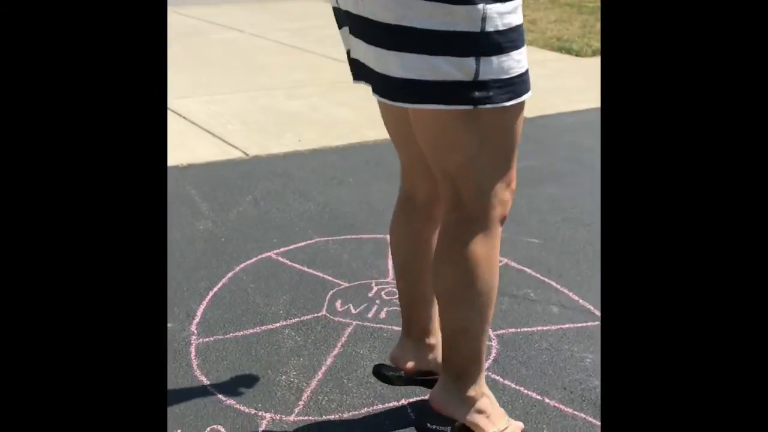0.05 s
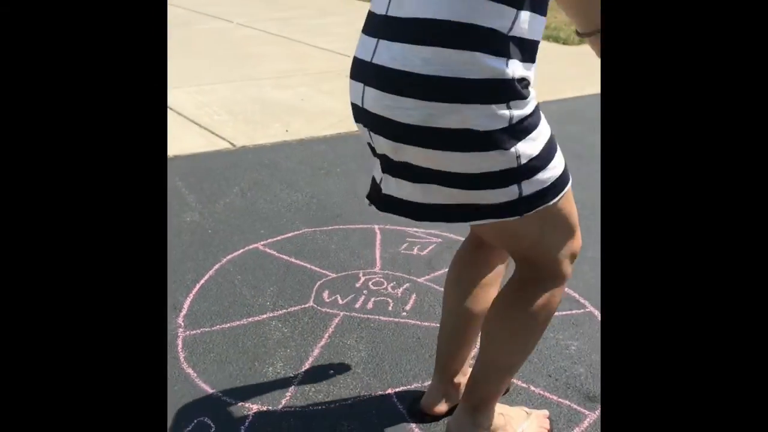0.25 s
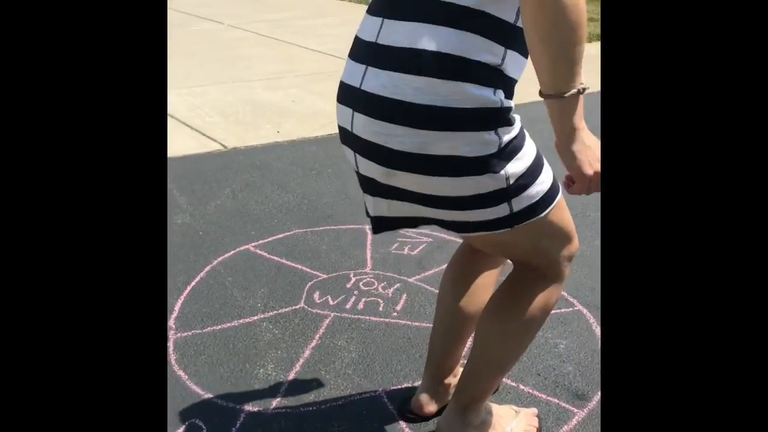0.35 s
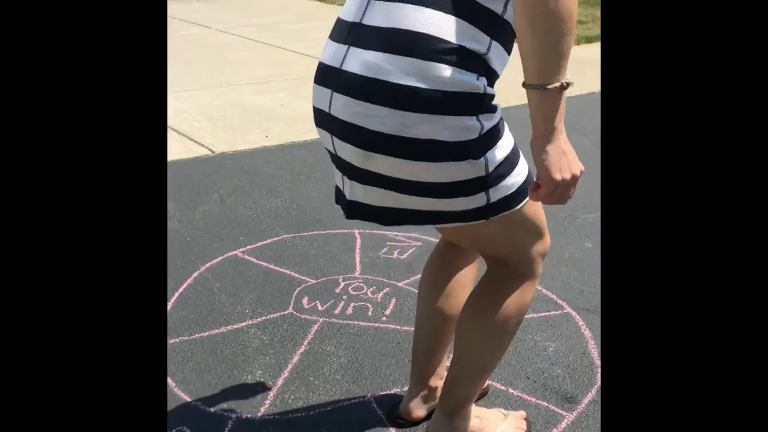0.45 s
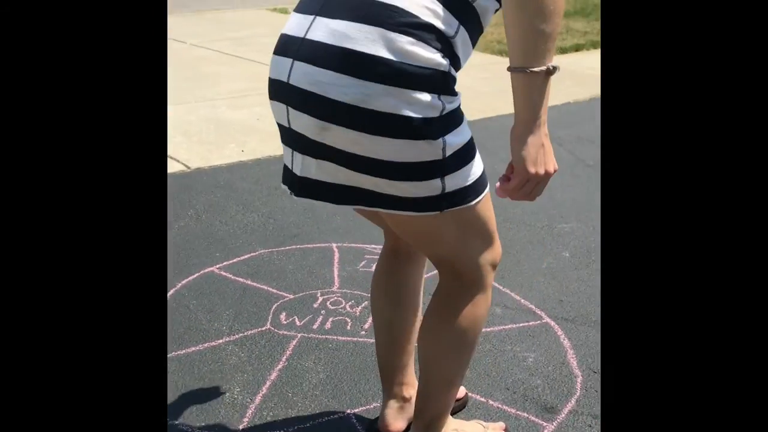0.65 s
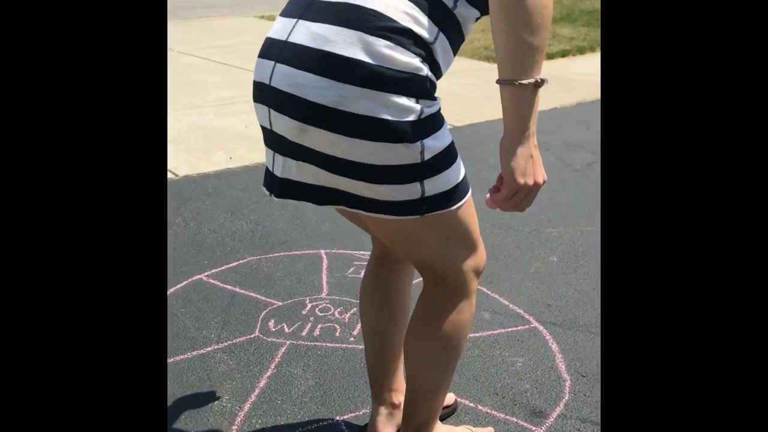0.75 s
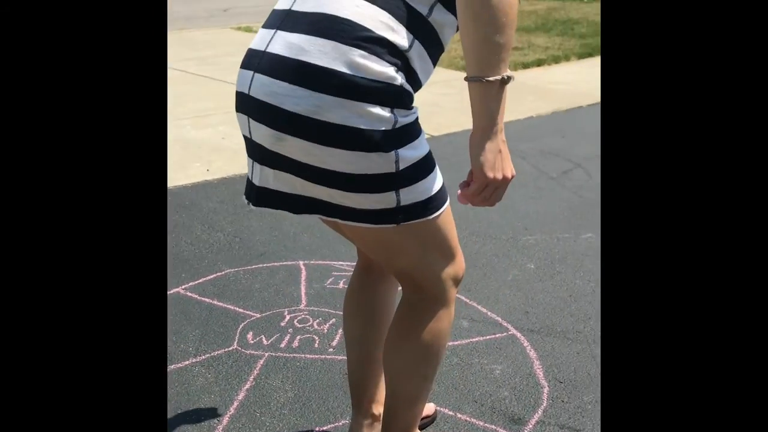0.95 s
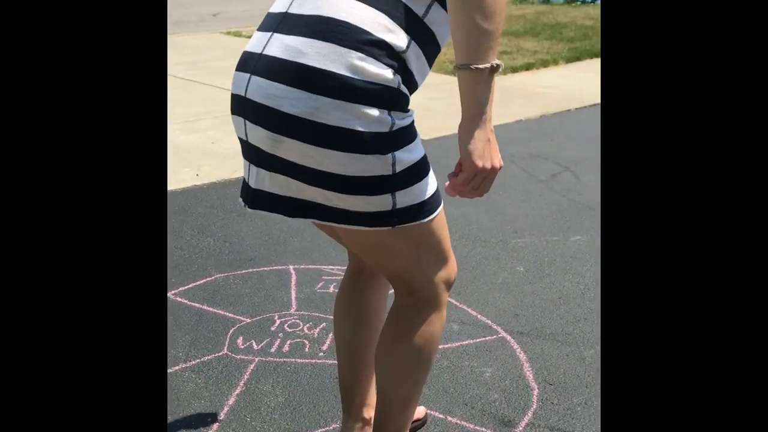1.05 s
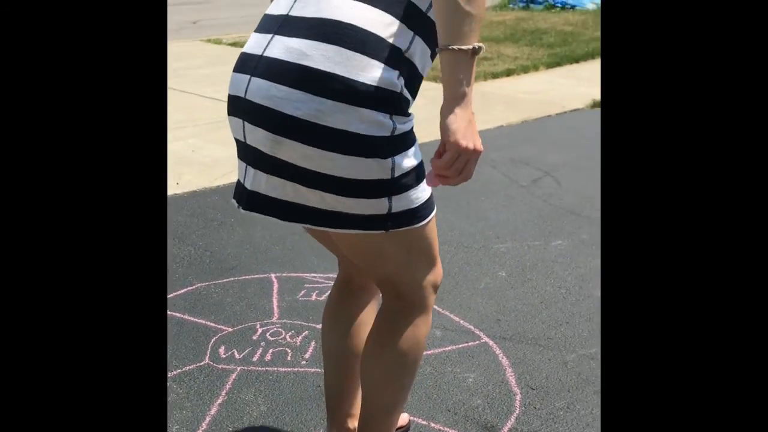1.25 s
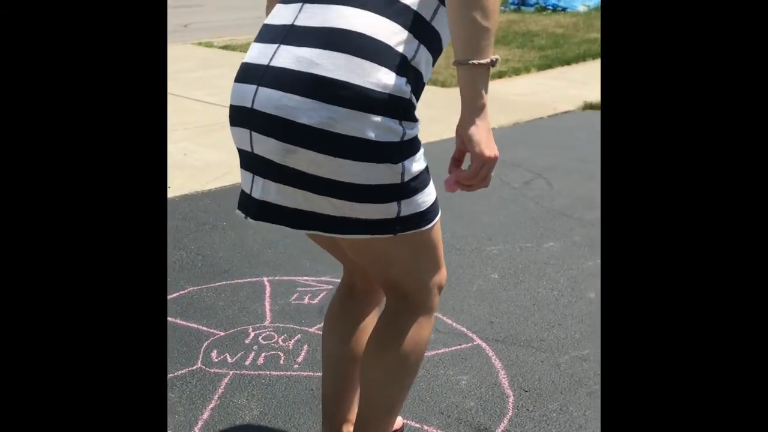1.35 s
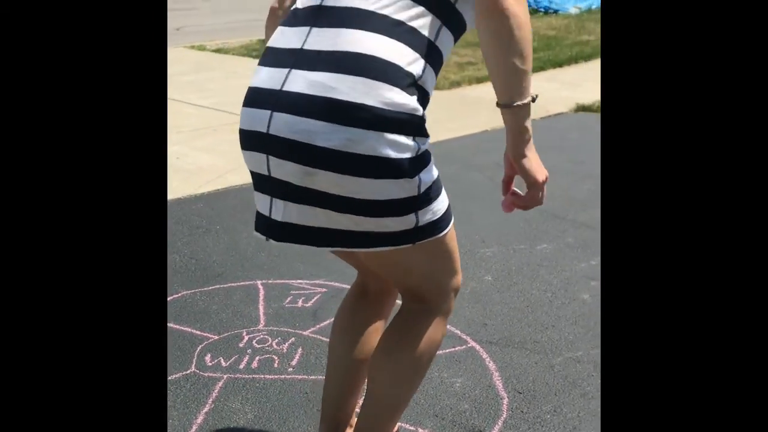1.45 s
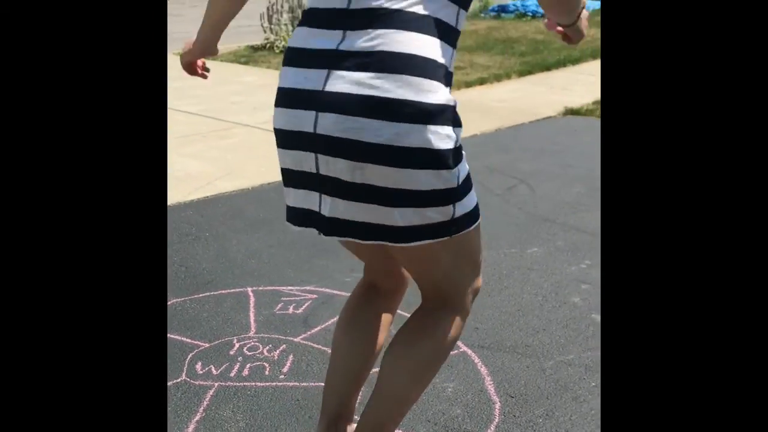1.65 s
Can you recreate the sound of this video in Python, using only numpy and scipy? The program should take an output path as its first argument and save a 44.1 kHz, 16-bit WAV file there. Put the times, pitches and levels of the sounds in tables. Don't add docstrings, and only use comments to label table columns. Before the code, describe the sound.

A single hop landing in slide sandals: a tiny tick, then a bright, dry double smack with grit on the driveway. A bird whistles before it, quiet open air follows, and a distant bird chirps at the end.

```python
import sys
import numpy as np
from scipy import signal
from scipy.io import wavfile
from scipy.ndimage import uniform_filter1d

SR = 44100
rng = np.random.default_rng(int(sys.argv[2]) if len(sys.argv) > 2 else 0)


def voltage_ratio(level):
    return 10 ** (np.asarray(level, float) / 20)


def store_pcm(level_fs):
    pcm = np.round(np.clip(level_fs, -1, 1) * 32767).astype(np.int16)
    wavfile.write(sys.argv[1], SR, np.atleast_2d(pcm).T)


N = 74970
T = np.arange(N) / SR
SLAP_LOW_HZ = 1000

# start [s], air-pocket peak [dB], pocket pitch [Hz], pocket swell [s], crack peak [dB].
SOLE_CONTACTS = [(.0002, -60, 3000, 0.00014, -56.5), (0.1639, -31, 3000, 0.0002, -39),
                 (.1639, -43, 5000, .0003, -60), (0.1644, -34, 2100, 0.00073, -60.5),
                 (.1675, -46, 3600, .0008, -55), (0.1685, -37, 1450, .0008, -53),
                 (.1713, -34, 1000, 0.0008, -56.5), (.1738, -39, 1300, .0006, -56),
                 (.1838, -48, 3000, 0.0002, -44), (.192, -50, 2300, .001, -62),
                 (.2034, -38, 2800, 0.0011, -36), (0.2068, -26.5, 2040, 0.00024, -36.5),
                 (0.2070, 2, 2100, 0.00026, -3), (.20716, -11, 3200, .00028, -60),
                 (.2070, -24, 15300, .0003, -60), (.2071, -20, 8350, .00025, -60),
                 (.2071, -15, 5200, .0003, -60), (.2071, -21, 6600, .00025, -60),
                 (.2083, -22.5, 2300, .0012, -39.5), (.2115, -21, 3300, .0006, -45),
                 (.2117, -29, 8300, .0004, -60), (.2117, -27, 5300, .0004, -60),
                 (.2116, -12, 1750, .0011, -11), (.2120, -26, 1030, 0.0016, -40.5),
                 (0.2139, -24, 1750, 0.001, -28), (0.2204, -30, 1250, .0006, -31),
                 (.2214, -45, 3000, .0004, -36), (0.2346, -17, 1900, 0.0003, -19),
                 (.2346, -27, 3400, .0005, -50), (.2346, -34, 7250, .0006, -50),
                 (.2346, -33, 5200, .0005, -50), (0.2357, -15, 1890, 0.001, -25),
                 (0.2346, -28, 1170, 0.001, -50.5), (.2368, -33, 2900, .0006, -31),
                 (.2405, -41, 2100, .001, -50), (1.5802, -62, 2900, 0.0006, -62)]


def rms_one(x):
    return x / np.sqrt(np.mean(x ** 2) + 1e-20)


def band(x, hz, order=2):
    return signal.sosfilt(signal.butter(order, hz, "band", fs=SR, output="sos"), x + 1e-18)


def high(x, hz):
    return signal.sosfilt(signal.butter(4, hz, "high", fs=SR, output="sos"), x + 1e-18)


def drift(rate_hz):
    r = np.exp(-80 * np.pi * rate_hz / SR)
    slow = signal.lfilter([1], [1, -2 * r, r * r], rng.standard_normal(N // 40 + 2002))[2000:]
    return np.interp(np.arange(N) / 40, np.arange(len(slow)), rms_one(slow))


def bell(centre_s, width_s):
    return np.exp(-.5 * ((T - centre_s) / width_s) ** 2)


def ring(x, hz, t60_s):
    r = voltage_ratio(-60 / (t60_s * SR))
    w = 2 * np.pi * hz / SR
    return signal.lfilter([0, np.sin(w)], [1, -2 * r * np.cos(w), r * r], x + 1e-18)


def coloured(source, spectrum, patchy_db):
    hz, db = np.transpose(spectrum)
    edges_hz = 130 * 2 ** np.arange(0, 7.3, .5)
    out = 0
    for k, pair in enumerate(zip(edges_hz, edges_hz[1:])):
        level_db = np.interp(np.log(pair).mean(), np.log(hz), db) + patchy_db * drift(30)
        out = out + voltage_ratio(level_db) * band(source[k % 2], pair)
    return rms_one(out)


def air():
    # frequency [Hz], density [dB per Hz].
    hiss_spectrum = [(140, 0), (260, -4.5), (450, -9.5), (1250, -14), (2500, -22.5), (6000, -27.5),
                     (10500, -37.5), (15000, -35.5)]
    # centre [s], level [dB], width [s].
    rustles = [
        (0.526, -82, 0.0099),
        (1.129, -83, 0.0044),
        (1.697, -73, 0.013),
    ]
    hiss = voltage_ratio(-59.5) * coloured(rng.standard_normal((2, N)), hiss_spectrum, patchy_db=1.0)
    puffs = sum(voltage_ratio(db) * bell(s, width_s) for s, db, width_s in rustles)
    return hiss + puffs * rms_one(band(rng.standard_normal(N), (10000, 16000)))


def breeze():
    # centre [s], peak [dB], pitch [Hz], width [s].
    bumps = [
        (0.098, -47, 58.6, 0.025),
        (0.195, -42.5, 61.7, 0.0098),
        (0.585, -42, 60.7, 0.0056),
        (.637, -36, 61.17, 0.016),
        (1.558, -76, 58, 0.012),
        (1.654, -57, 55.1, 0.025),
    ]
    rumble_db, rumble_hz = -57.5, (36.47, 123)
    noise = band(rng.standard_normal(N + SR), rumble_hz, order=3)[SR:]
    out = voltage_ratio(rumble_db + 2.32 * drift(6.2)) * rms_one(noise)
    for s, db, hz, width_s in bumps:
        out = out + voltage_ratio(db) * bell(s, width_s) * np.sin(2 * np.pi * hz * (s - T))
    return out


def drone():
    # time [s], level [dB].
    loudness = [(0, -49), (.2, -61), (.45, -53), (.75, -51), (.95, -52.5), (1.15, -59.5), (1.4, -56.5),
                (1.7, -74)]
    # multiple of the base pitch, level [dB].
    orders = [(1, -2.5), (2, -15), (3, -22)]
    base_hz, wander, flutter_db = 84.2, .008, 4
    phase = 2 * np.pi * np.cumsum(base_hz * (1 + wander * drift(3.4))) / SR
    tone = sum(voltage_ratio(db + flutter_db * drift(15)) * np.sin(round(k) * phase) for k, db in orders)
    return np.sqrt(2) * voltage_ratio(np.interp(T, *np.transpose(loudness))) * tone


def whistle(notes, overtones):
    trill_db = 1.8
    out = np.zeros(N)
    for note in notes:
        s, hz, db = np.transpose(note)
        phase = 2 * np.pi * np.cumsum(np.interp(T, s, hz)) / SR
        tone = np.sin(phase)
        for k, over_db in overtones:
            unsteady = voltage_ratio(over_db + 10.0 * drift(14))
            tone = tone + unsteady * np.sin(round(k) * phase + 1.6 * drift(60))
        before_db = -150 if s[0] > .001 else None
        level = voltage_ratio(np.interp(T, s, db, right=-150, left=before_db))
        out += np.sqrt(2) * uniform_filter1d(level, size=60) * tone * voltage_ratio(trill_db * drift(70))
    return out


def near_bird():
    # time [s], pitch [Hz], level [dB].
    notes = [
        [(0.0, 2256, -55), (0.016, 2234, -44.5), (0.022, 2285, -51), (.045, 2325, -50), (0.058, 2357, -44),
         (0.07, 2400, -50.5), (0.08, 2450, -48.5), (0.086, 2370, -54.5)],
        [(.082, 2300, -62.5), (.092, 2350, -53), (.1, 2440, -64), (.115, 2360, -61), (.135, 2430, -62.5),
         (.148, 2380, -63), (.155, 2360, -78)],
        [(.078, 2670, -82.5), (.085, 2780, -64.5), (.092, 2967, -60.5), (.097, 2950, -83)],
        [(.116, 2000, -75), (.127, 2135, -52), (.155, 2135, -49.5), (.165, 2125, -50), (.172, 2110, -75)],
        [(.105, 1780, -75.5), (.114, 1850, -65.5), (.12, 1890, -84)],
        [(.005, 2840, -82), (.018, 2820, -75.5), (.045, 2820, -75.5), (.06, 2950, -87)],
    ]
    # multiple of the pitch, level [dB].
    overtones = [(2, -36), (6, -36)]
    # time [s], pitch [Hz], level [dB].
    thin_note = [(.072, 4950, -90), (.085, 5200, -77), (.098, 5300, -73), (.11, 5200, -76),
                 (.13, 5300, -86)]
    # multiple of the pitch, level [dB].
    thin_overtones = [(2, -3)]
    return whistle(notes, overtones) + whistle([thin_note], thin_overtones)


def far_bird():
    # time [s], pitch [Hz], level [dB].
    notes = [
        [(1.556, 4367, -77), (1.565, 4770, -58), (1.579, 4780, -59), (1.594, 4850, -64), (1.599, 4500, -58.5),
         (1.601, 4450, -92)],
        [(1.548, 3333, -77), (1.56, 4100, -67.5), (1.571, 4425, -63), (1.59, 4460, -59), (1.598, 4400, -58),
         (1.601, 4400, -90)],
        [(1.601, 3620, -82), (1.606, 3380, -67), (1.612, 2950, -73), (1.615, 2890, -88)],
        [(1.642, 2900, -82), (1.65, 3050, -69), (1.66, 3300, -66), (1.667, 3550, -74), (1.675, 3980, -70),
         (1.682, 4120, -64), (1.691, 4220, -64), (1.694, 4230, -89)],
        [(1.664, 3780, -81), (1.67, 4100, -71), (1.68, 4450, -71), (1.69, 4600, -74), (1.699, 4700, -75)],
    ]
    # multiple of the pitch, level [dB].
    overtones = [(2, -45)]
    return whistle(notes, overtones)


def swish():
    # time [s], level [dB].
    loudness = [(0, -62.5), (.1, -65), (.14, -58), (.19, -64), (.26, -69)]
    noise = rms_one(band(rng.standard_normal(N), (200, 1160)))
    return voltage_ratio(np.interp(T, *np.transpose(loudness), right=-150)) * noise


def grit():
    # time [s], level [dB].
    pressure = [(.162, -67.5), (.165, -53), (.176, -53), (.186, -62), (.2025, -63), (.204, -39.5),
                (.215, -34), (.219, -53), (.222, -45), (.234, -52), (.236, -41), (.24, -50), (.3, -74)]
    # frequency [Hz], density [dB per Hz].
    grit_spectrum = [(200, -20), (300, -5), (920, -3.5), (1760, -1), (3900, -5), (6600, -13), (9500, -22),
                     (16000, -30)]
    grains_per_s, spread_db = 4800, 3
    sizes = voltage_ratio(spread_db * np.minimum(rng.exponential(1, N), 4)) * rng.choice([-1, 1], N)
    grains = sizes * (rng.random((2, N)) < grains_per_s / SR)
    level = voltage_ratio(np.interp(T, *np.transpose(pressure), left=-150, right=-150))
    return level * coloured(grains, grit_spectrum, patchy_db=3)


def thuds():
    # time [s], peak [dB].
    pushes = [
        (0.166, -46),
        (0.2065, -46),
        (.2118, -35.5),
        (0.222, -42),
        (0.235, -36),
    ]
    # frequency [Hz], level [dB], decay to -60 dB [s].
    modes = [(326, -8, 0.0487), (490, 4, 0.018), (680, -2.5, 0.008), (1020, -3, 0.01), (1300, -4, 0.01)]
    soft_s, low_hz = 0.00011, 261
    push = sum(voltage_ratio(db) * bell(s, soft_s / 4) for s, db in pushes) / (soft_s * SR / 2)
    return high(sum(voltage_ratio(db) * ring(push, hz, t60_s) for hz, db, t60_s in modes), low_hz)


def slaps():
    steepness = 2.4
    out = np.zeros(N)
    for s, db, hz, swell_s, _ in SOLE_CONTACTS:
        t = np.maximum(T - s, 0)
        swell = (t / swell_s * np.exp(1 - t / swell_s)) ** steepness
        out += voltage_ratio(db) * swell * np.cos(2 * np.pi * hz * t + 2.0)
    return high(out, SLAP_LOW_HZ)


def cracks():
    # frequency [Hz], density [dB per Hz].
    crack_spectrum = [(900, -6.5), (1350, -6), (3100, -5), (5200, -8.5), (6500, -8), (8300, -8.5),
                      (11000, -24.5), (15800, -16)]
    crack_s, tail_s, tail_db = .00018, 0.0013, -16.5
    soft_below_db, soft_hz = -30, 6000
    shapes = np.zeros((2, N))
    for s, *_, db in SOLE_CONTACTS:
        t = np.maximum(T - s, 0)
        decay = np.exp(-t / crack_s) + voltage_ratio(tail_db) * np.exp(-t / tail_s)
        shapes[int(db < soft_below_db)] += voltage_ratio(db) * (T > s) * decay
    bursts = []
    for shape in shapes:
        noise = coloured(shape * rng.standard_normal((2, N)), crack_spectrum, patchy_db=1)
        bursts.append(noise * np.sqrt(np.mean(shape ** 2)))
    hard, soft = bursts
    return high(hard, SLAP_LOW_HZ) + band(soft, (SLAP_LOW_HZ, soft_hz), order=1)


def yard(x, t60_s, wall_db):
    wall_s, wall_spread_s = .127, 0.046
    t = T[:SR // 2]
    scatter = np.exp(-np.log(1000) * t / t60_s) * (t > .004)
    wall = voltage_ratio(wall_db) * np.exp(-np.abs(t - wall_s) / wall_spread_s) * (t > wall_s)
    tail = band(rng.standard_normal(len(t)) * (scatter + wall), (600, 5200), order=1)
    return signal.fftconvolve(x, tail / np.sqrt(np.sum(tail ** 2)))[:N]


def scene():
    background = air() + breeze() + drone()
    near, far = near_bird(), far_bird()
    pockets, edges = slaps(), cracks()
    feet = swish() + grit() + thuds() + pockets + edges
    feet_echo = voltage_ratio(-33.5) * yard(edges + voltage_ratio(-4.5) * pockets, t60_s=.45, wall_db=-9.5)
    bird_echo = voltage_ratio(-15) * yard(voltage_ratio(-7) * near + far, t60_s=.16, wall_db=-39.5)
    return (background + near + far + feet + feet_echo + bird_echo)[None]


def band_limit(x):
    return signal.sosfilt(signal.butter(12, 17650, fs=SR, output="sos"), x)


def record(dry):
    top, cutoff_hz = 1.1, 17100
    rounded = top * np.tanh(dry / top)
    cut = signal.sosfilt(signal.cheby2(10, 60, cutoff_hz, fs=SR, output="sos"), rounded)
    return band_limit(cut)


dry = scene()
out = record(dry)
store_pcm(out)
```